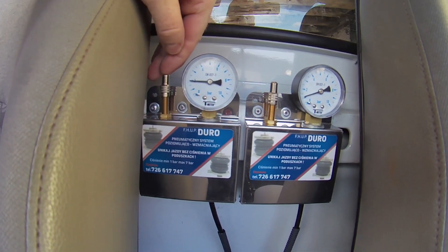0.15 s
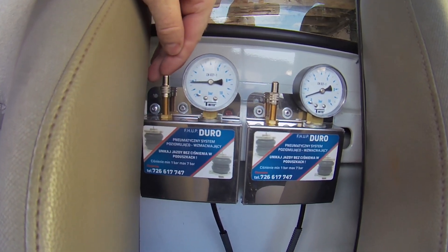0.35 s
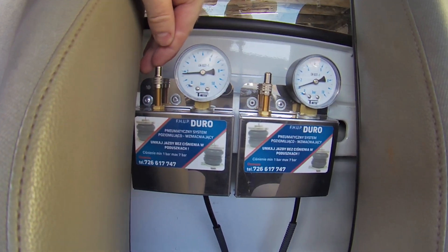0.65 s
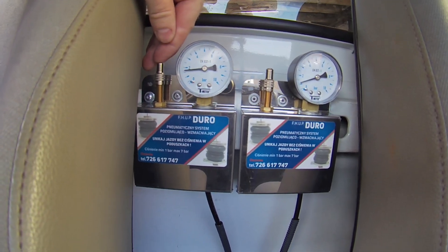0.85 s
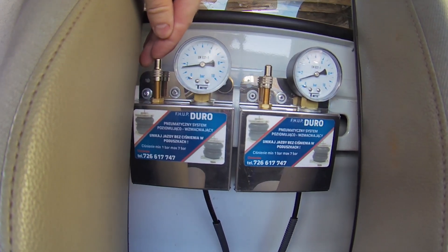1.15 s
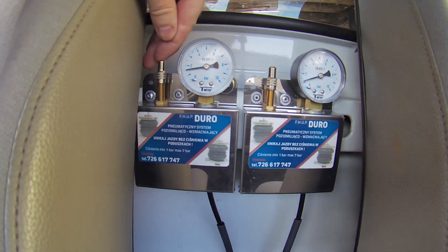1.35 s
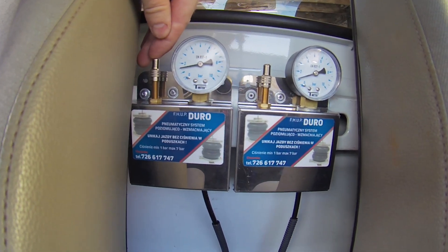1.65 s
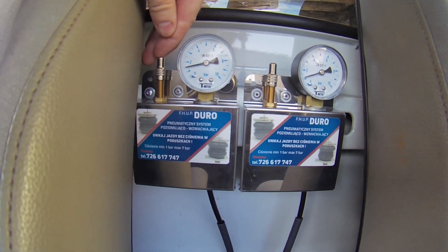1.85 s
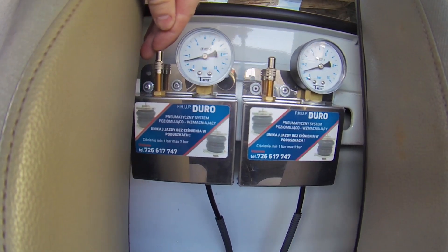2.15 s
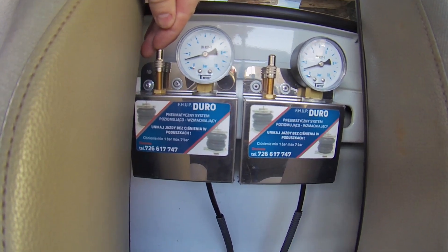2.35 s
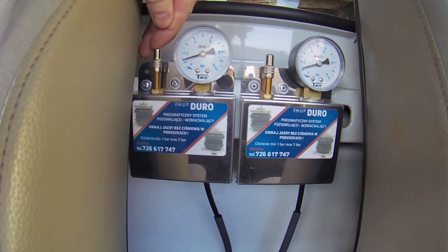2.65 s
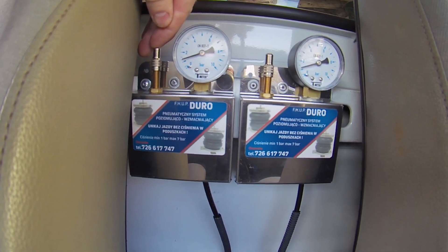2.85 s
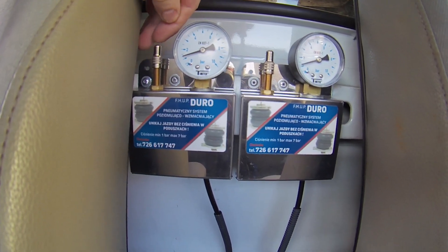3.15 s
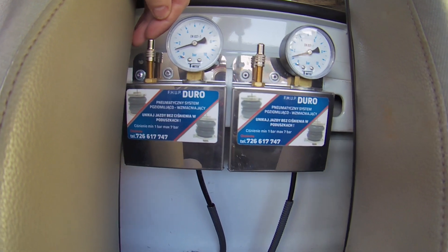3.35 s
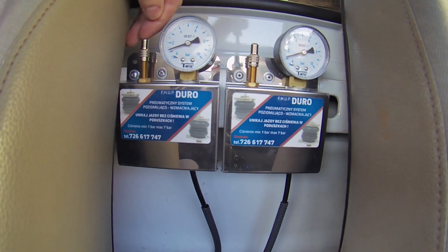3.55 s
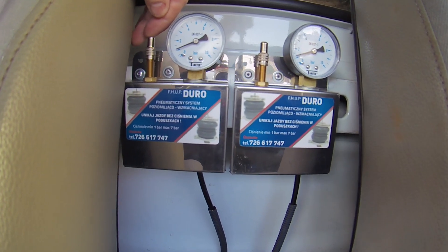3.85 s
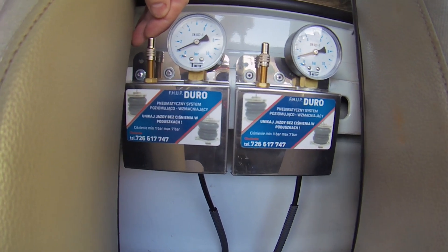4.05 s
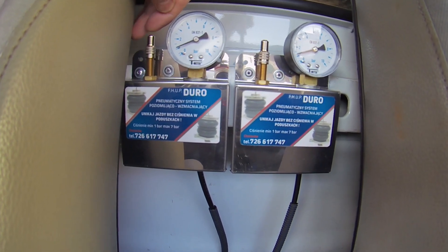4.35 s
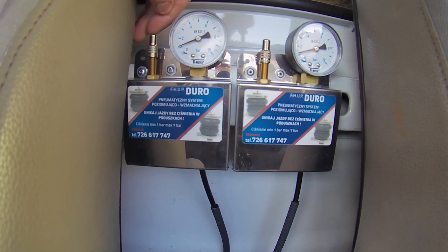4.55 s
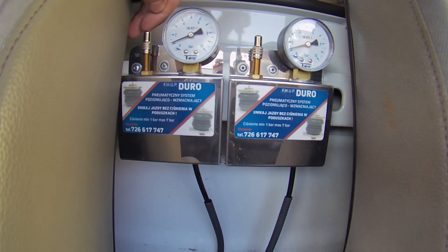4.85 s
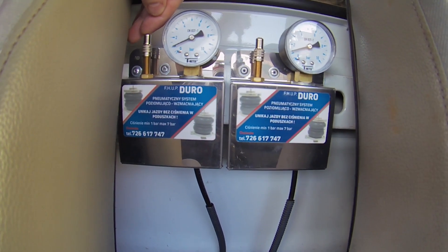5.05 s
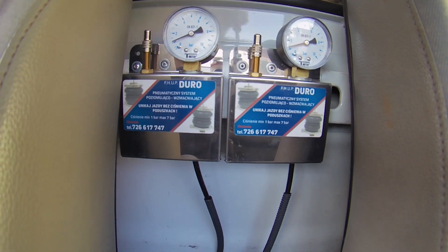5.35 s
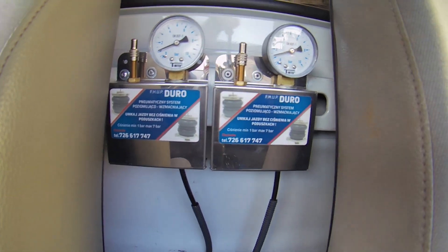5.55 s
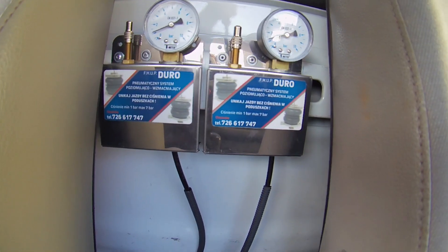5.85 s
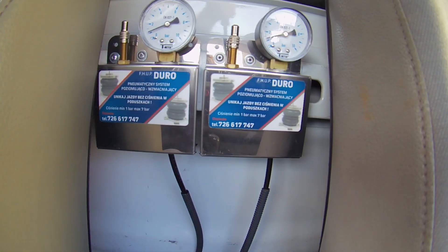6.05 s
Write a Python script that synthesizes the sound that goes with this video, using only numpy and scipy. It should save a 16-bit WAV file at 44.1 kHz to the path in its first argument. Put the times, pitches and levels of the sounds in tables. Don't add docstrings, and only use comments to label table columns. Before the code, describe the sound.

Close up in a padded, dry cabin, pressurised air rushes from a little brass valve: one long, steady, high hiss, a click and brief gap, another forceful release of nearly a second, then smaller spurts. The pin taps and the last trapped air spits out softly. Afterwards only muffled distant engines, low rumble and faint microphone noise remain.

```python
import sys
import numpy as np
from scipy import signal
from scipy.io import wavfile
from scipy.ndimage import uniform_filter1d

SR = 44100
rng = np.random.default_rng(int(sys.argv[2]) if len(sys.argv) > 2 else 0)


def amp(db):
    return 10 ** (np.asarray(db, float) / 20)


def write(x):
    x = np.atleast_2d(x).T
    wavfile.write(sys.argv[1], SR, np.round(np.clip(x, -1, 1) * 32767).astype(np.int16))


N = 274302


def evened(x):
    return x / np.sqrt(np.mean(x ** 2) + 1e-20)


def read(points, hz):
    f, value = np.transpose(points)
    return np.interp(np.log(hz + 1), np.log(f + 1), value)


def bumps(modes, hz):
    return sum(db / (1 + (2 * (hz - f) / width) ** 2) for f, width, db in modes)


def coloured(gain, size):
    z = rng.standard_normal((*gain.shape, 2)) @ [1, 1j]
    return signal.istft((z * gain).T, nperseg=size, noverlap=size * 3 // 4)[1][:N]


def patches(frames, bins, long, wide):
    noise = rng.standard_normal((frames, bins))
    return evened(uniform_filter1d(uniform_filter1d(noise, long, 0), wide, 1))


def steady(points, size, patchy_db):
    hz = np.fft.rfftfreq(size, 1 / SR)
    blobs = patches(N * 4 // size + 5, len(hz), 8, 6)
    return evened(coloured(amp(read(points, hz) + patchy_db * blobs), size))


def wander(rate_hz):
    t = np.arange(0, N + 128, 128) / SR
    slow = sum(np.sin(2 * np.pi * (f * rate_hz * t + rng.random())) / np.sqrt(f)
               for f in np.geomspace(.1, 1, num=16))
    return np.interp(np.arange(N) / SR, t, evened(slow))


# f/Hz, density/dB
JET_COLOUR = [(150, -32.5), (500, -28), (1500, -20.5), (3200, -18), (4600, -17.5), (6500, -11.5),
              (8600, -3.5), (10000, -10), (11500, -14.5), (14000, -14), (16000, -57)]
# f/Hz, width/Hz, boost/dB
OPEN_MODES = [(1380, 52, -2.5), (1650, 86, 0.5), (2265, 100, 3.5), (3430, 83, -4.5), (3880, 850, 2.5),
              (5060, 740, 3.5), (7050, 1150, 3.5), (8100, 320, -3.5), (9260, 670, 4.5), (10300, 400, 0),
              (13500, 700, 3.5)]
# f/Hz, width/Hz, boost/dB
COVERED_MODES = [(2310, 150, 4), (3180, 110, -12), (3650, 2200, 3.5), (5200, 380, 4), (6550, 500, 5.5),
                 (8100, 990, 5), (9220, 463, 5), (10620, 260, 6), (12000, 780, 4.5)]
# f/Hz, width/Hz, boost/dB per dB
NARROW_GAP_MODES = [(3780, 630, 0.36), (5940, 320, 0.43), (7230, 1000, -0.17), (8860, 1200, 0.11)]
# t/s, flow/dB
PRESSES = [
    [(0.0, -43), (0.1, -36), (0.23, -37), (0.41, -26.5), (3.0, -31.5), (3.05, -34), (3.08, -45.5),
     (3.11, -46), (3.13, -73)],
    [(3.245, -84), (3.272, -58.5), (3.313, -47), (3.4, -54)],
    [(3.401, -53), (3.42, -46), (3.613, -28.5), (3.753, -24.5), (3.863, -27.5), (4.259, -30),
     (4.315, -36.5), (4.375, -95)],
    [(4.595, -87), (4.61, -55), (4.63, -46), (4.724, -44.5), (4.768, -59.5), (4.81, -82)],
    [(4.86, -80), (4.886, -42), (4.912, -37.5), (4.946, -38.5), (5.078, -29), (5.128, -30.5),
     (5.154, -32.5), (5.21, -70)],
    [(5.211, -65), (5.258, -56.5), (5.284, -55), (5.302, -66), (5.342, -59), (5.41, -76)],
]
# outlet cover/0-1, roar below 3 kHz/dB, fizz above 11 kHz/dB
GRIPS = [
    (0, -18.5, -16),
    (0.98, -24, -14),
    (0.58, -18, -16),
    (0.9, -20, -18),
    (1, -19.5, -15),
    (0.78, -14.5, -17),
]
FULL_FLOW_DB, COVER_PER_DB = -31, 0.7
ROAR_PER_DB, FIZZ_PER_DB = 0.2155, 0.13
OPENING_THIN_DB, QUICK_DB_PER_S = -3.5, 300


def jet():
    s, flow_db = np.vstack(PRESSES).T
    hz = np.fft.rfftfreq(512, 1 / SR)
    frame_s = np.arange(N // 128 + 5) * 128 / SR
    burst = np.searchsorted([rows[0][0] for rows in PRESSES[1:]], frame_s)
    cover, roar_db, fizz_db = np.array(GRIPS)[burst].T[:, :, None]
    over_db = np.interp(frame_s, s, flow_db)[:, None] - FULL_FLOW_DB
    db_per_s = uniform_filter1d(np.gradient(over_db, frame_s, axis=0), size=8, axis=0)
    opening = np.maximum(np.tanh(db_per_s / QUICK_DB_PER_S), 0)

    cover = np.clip(cover * (1 + COVER_PER_DB * np.maximum(over_db, 0)), 0, 1)
    roar_db = roar_db - ROAR_PER_DB * over_db + OPENING_THIN_DB * opening
    fizz_db = fizz_db - FIZZ_PER_DB * over_db
    colour_db = read(JET_COLOUR, hz) + (1 - cover) * bumps(OPEN_MODES, hz) + cover * bumps(COVERED_MODES, hz)
    colour_db = colour_db + (roar_db + 17) / (1 + (hz / 3000) ** 4)
    colour_db = colour_db + (fizz_db + 13) / (1 + (11200 / (hz + 1)) ** 24)
    weak_db = np.clip(-over_db, 0, 18)
    gain = amp(colour_db + weak_db * (1.5 - 1.1 * cover) * bumps(NARROW_GAP_MODES, hz))
    gain /= np.sqrt((gain ** 2).sum(1, keepdims=True))
    gain *= amp(0.5 * patches(len(frame_s), len(hz), 14, 6))

    t = np.arange(N) / SR
    is_open = sum((t > rows[0][0] - .001) & (t < rows[-1][0]) for rows in PRESSES)
    flutter_db = 0.16 * evened(uniform_filter1d(rng.standard_normal(N), 180))
    return evened(coloured(gain, 512)) * amp(np.interp(t, s, flow_db) + flutter_db) * is_open


SEEP_HZ, SEEP_DB, SEEP_PER_S = 8700, -72.5, 700


def seep():
    hit = rng.random(N) < SEEP_PER_S / SR
    size = amp(3.4 * np.minimum(rng.exponential(1, N), 4)) * hit * rng.choice([-1, 1], N)
    t = np.arange(90) / SR
    grain = np.hanning(90) * np.sin(2 * np.pi * SEEP_HZ * t)
    return amp(SEEP_DB) * evened(np.convolve(size, grain)[:N])


# t/s, peak/dB, f/Hz, fade/s
GUSTS = [(.2, -40.5, 30.65, 0.31), (.55, -35, 30.34, 0.13), (.76, -35, 29.13, .16),
         (1.14, -37.5, 29.05, 0.18), (1.45, -40.5, 26.2, 0.2), (1.82, -39.5, 27.54, .06),
         (1.98, -36, 30.5, 0.27), (2.39, -42.5, 27.7, 0.056), (2.61, -37, 27.37, 0.27),
         (3.13, -43, 27.42, 0.1), (3.41, -40.5, 30.6, 0.17), (3.64, -36, 28.6, 0.072),
         (3.82, -40, 29.24, 0.055), (4.02, -39, 32.07, 0.14), (4.28, -42, 32.3, 0.046),
         (4.41, -38.5, 30.9, 0.074), (4.62, -42, 30.67, 0.18), (4.77, -38, 31.03, 0.055),
         (4.92, -36, 31.6, 0.11), (5.12, -40, 31.57, 0.075), (5.29, -37.5, 31.58, 0.063),
         (5.53, -36.5, 28.98, 0.099), (5.7, -40, 28.61, 0.1), (5.86, -36.5, 30.5, 0.3),
         (6.2, -33, 30.7, .12)]
SWELL_SHARE = 0.69


def boom():
    t, (s, db, hz, fade_s) = np.arange(0, N + 64, 64) / SR, np.transpose(GUSTS)
    age = (t[:, None] - s) / fade_s
    swell = (amp(db) * np.exp(-(age / np.where(age < 0, SWELL_SHARE, 1)) ** 2)).max(1)
    every = np.arange(N) / SR
    turns = np.cumsum(np.interp(every, s, hz)) / SR
    return np.sqrt(2) * np.interp(every, t, swell) * np.sin(2 * np.pi * turns)


# start t/s, length/s, firing f/Hz at start, f/Hz at end, level/dB
ENGINES = [(-.05, 0.3, 137, 142, -59.5), (.02, 0.22, 226, 228, -67.5), (.55, .2, 153, 156, -60.5),
           (0.798, 0.13, 113, 115, -61), (0.851, 1.0, 77.9, 90.2, -58), (1.603, 0.46, 137.6, 140.9, -57),
           (2.183, .46, 149.5, 150.3, -57.5), (2.347, 1.0, 87.9, 82.6, -61.5), (2.982, .16, 155, 158, -66),
           (4.359, 0.15, 155, 156.5, -63.5), (4.849, 0.61, 91.55, 101.6, -54.5),
           (5.68, .65, 103.8, 112.1, -58)]
ENGINE_WAVER_DB, ENGINE_DRIFT_HZ = 3, .8


def engines():
    out = np.zeros(N)
    for start, length, from_hz, to_hz, db in ENGINES:
        part = slice(max(round(start * SR), 0), round((start + length) * SR))
        along = (np.arange(N)[part] / SR - start) / length
        hz = from_hz + (to_hz - from_hz) * along + ENGINE_DRIFT_HZ * wander(8)[part]
        passing = np.sqrt(abs(np.sin(np.pi * along)))
        level_db = db + ENGINE_WAVER_DB * np.clip(wander(24)[part], -1.5, 1)
        out[part] += amp(level_db) * passing * np.sin(2 * np.pi * np.cumsum(hz) / SR)
    return np.sqrt(2) * out


# f/Hz, density/dB
RUMBLE_COLOUR = [(5, -20), (10, -2.5), (22, -6), (38, 0.5), (46, -13.5), (55, -6.5), (64, -14.5),
                 (75, -27.5), (100, -18.5), (125, -33), (200, -57), (300, -90)]


def rumble():
    return amp(-45) * steady(RUMBLE_COLOUR, size=8192, patchy_db=1.5)


# f/Hz, density/dB
ROAD_COLOUR = [(60, -51), (100, -4), (150, 1.5), (200, -5.5), (270, -8.5), (400, -21.5), (600, -32)]
ROAD_DB, ROAD_SWELL_DB, ROAD_FADE_DB_PER_S = -66.5, 2.5, -0.46


def road():
    from_middle_s = (np.arange(N) - N / 2) / SR
    level_db = ROAD_DB + ROAD_FADE_DB_PER_S * from_middle_s + ROAD_SWELL_DB * wander(5)
    return amp(level_db) * steady(ROAD_COLOUR, size=2048, patchy_db=2.5)


# f/Hz, density/dB
HUSH_COLOUR = [(150, -30), (300, -14.5), (600, -20), (1050, -17), (1500, -23.5), (3000, -30), (5500, -32),
               (7200, -28.5), (8000, -21.5), (8600, -22.5), (9300, -38), (10200, -34), (12000, -36),
               (14500, -32.5)]
HUSH_DB = -65
WHINE_HZ, WHINE_WIDTH_HZ, WHINE_DB = 9660, 70, -77


def microphone_noise():
    b, a = signal.iirpeak(WHINE_HZ, WHINE_HZ / WHINE_WIDTH_HZ, SR)
    whine = evened(signal.lfilter(b, a, rng.standard_normal(N)))
    return amp(HUSH_DB) * steady(HUSH_COLOUR, size=512, patchy_db=1.3) + amp(WHINE_DB) * whine


# t/s, air peak/dB, air t60/s, knock/dB, tick/dB
SPITS = [
    (3.141, -41, 0.094, -54.5, -46),
    (4.339, -51, 0.081, -61, -70),
    (5.17, -64, 0.084, -55.5, -80),
    (5.544, -63, 0.03, -80, -58),
]
# f/Hz, density/dB
SPIT_COLOUR = [(1500, -50), (2800, -27), (3600, -11), (4500, -5), (5200, -8), (7800, 0), (9000, 0),
               (10500, -22), (12200, -27), (13400, -20), (16000, -26)]
BURST_DB, BURST_S = 4.5, .003


def spits():
    puff = steady(SPIT_COLOUR, size=256, patchy_db=2.5)
    housing = signal.butter(3, [450 / SR * 2, 1200 / SR * 2], "band", output="sos")
    knock = evened(signal.sosfilt(housing, rng.standard_normal(N)))
    tick = evened(np.diff(rng.standard_normal(N + 2), 2))
    t, out = np.arange(N) / SR, np.zeros(N)
    for s, db, t60, knock_db, tick_db in SPITS:
        age = np.maximum(t - s, 0)
        air = amp(db - 60 * age / t60 + BURST_DB * np.exp(-age / BURST_S)) * puff
        air += amp(tick_db - 60 * age / .012) * tick
        out += (1 - np.exp(-age / .0002)) * air
        out += (1 - np.exp(-age / 0.0012)) * amp(knock_db - 60 * age / 0.17) * knock
    return out


# f/Hz, level/dB, t60/s
TAP_MODES = [(955, -47, 0.042), (1540, -38, 0.031), (2400, -51, .03)]
TAP_S = 5.1555


def tap():
    age = np.maximum(np.arange(N) / SR - TAP_S, 0)
    ring = sum(amp(db - 60 * age / t60) * np.sin(2 * np.pi * hz * age) for hz, db, t60 in TAP_MODES)
    return (1 - np.exp(-age / 0.0012)) * ring


def cabin(x):
    taps = np.zeros(6000)
    at = np.arange(60, 5960, 20) + rng.integers(0, 20, 295)
    taps[at] = rng.choice([-1., 1.], len(at)) * amp(-60 * at / SR / .1)
    return signal.oaconvolve(x, taps / np.linalg.norm(taps))[:N]


def scene():
    valve = jet() + seep() + spits() + tap()
    background = boom() + engines() + rumble() + road() + microphone_noise()
    mono = amp(-.3) * valve + amp(-16) * cabin(valve) + background
    return np.array([mono, mono])


# f/Hz, share of slots dropped/0-1
DROPPED_SHARE = [(100, 0), (150, .1), (210, 0), (2000, 0), (2600, .1), (3220, .36), (3500, .25),
                 (4500, .27), (5100, .02), (10800, 0), (11300, .28), (12300, .24), (13000, .15),
                 (14000, .3)]
EDGE_HZ = 13960


def band_gate(x):
    top = signal.oaconvolve(x, signal.firwin(255, [EDGE_HZ, 16500], pass_zero=False, fs=SR), "same")
    power = uniform_filter1d(top ** 2, 64)
    attack = 1. * (power > 40 * uniform_filter1d(np.roll(power, 250), 300))
    hz, t, z = signal.stft(x, SR, nperseg=2048, noverlap=1792)
    calm = np.interp(t * SR, np.arange(N), uniform_filter1d(attack, 1600)) < 1e-4
    slots = patches(len(t) // 4 + 1, len(hz) // 4 + 1, 2, 1)
    slots = slots.repeat(4, 0).repeat(4, 1)[:len(t), :len(hz)]
    rank = slots.T.argsort(1).argsort(1) / len(t)
    loud = (abs(z[hz > 3000]) ** 2).sum(0) > amp(-125)
    masked = loud | (hz[:, None] < 300)
    keep = np.where((rank < read(DROPPED_SHARE, hz)[:, None]) & calm & masked, .02, 1.)
    edge_hz = EDGE_HZ - 220 * ~loud + 60 * patches(len(t), 1, 8, 1).T
    gated = signal.istft(z * keep * (hz[:, None] < edge_hz), SR, nperseg=2048, noverlap=1792)[1][:N]
    return gated + .5 * top * uniform_filter1d(attack, 64)


def band_limit(x):
    return signal.sosfilt(signal.butter(12, 15280, fs=SR, output="sos"), x)


def record(dry):
    mono = band_gate(dry[0] + 0.0016)
    return band_limit(np.array([mono, mono]))


dry = scene()
out = record(dry)
write(out)
```